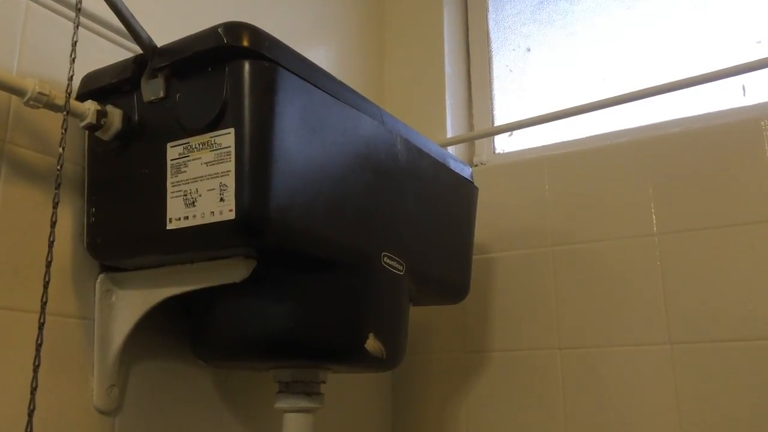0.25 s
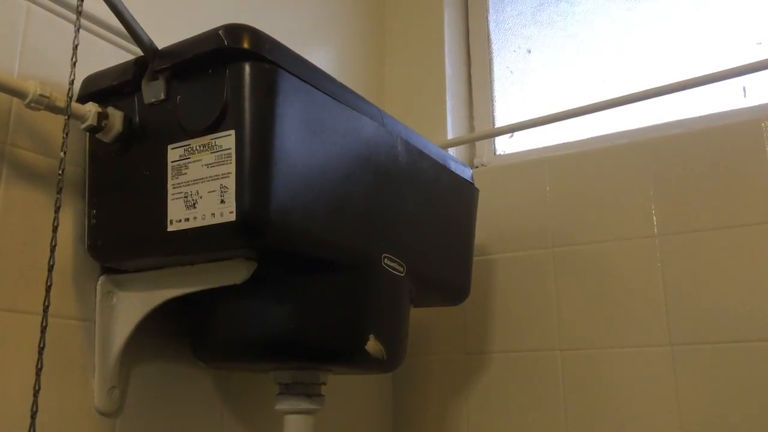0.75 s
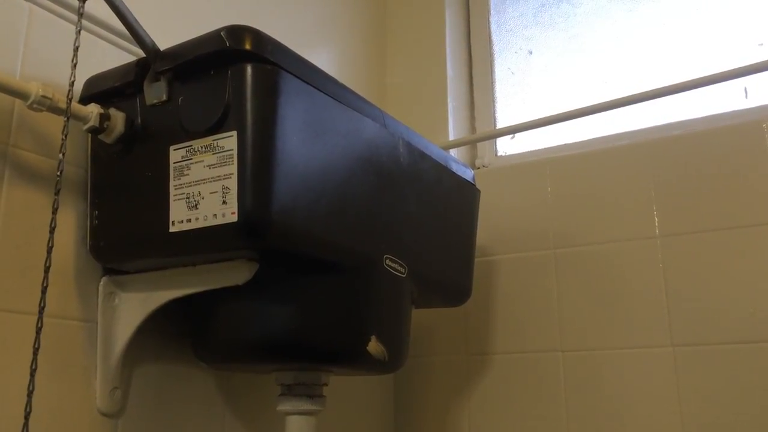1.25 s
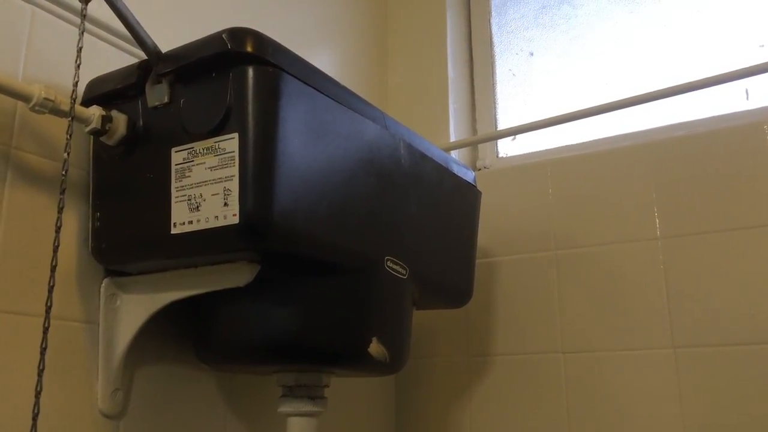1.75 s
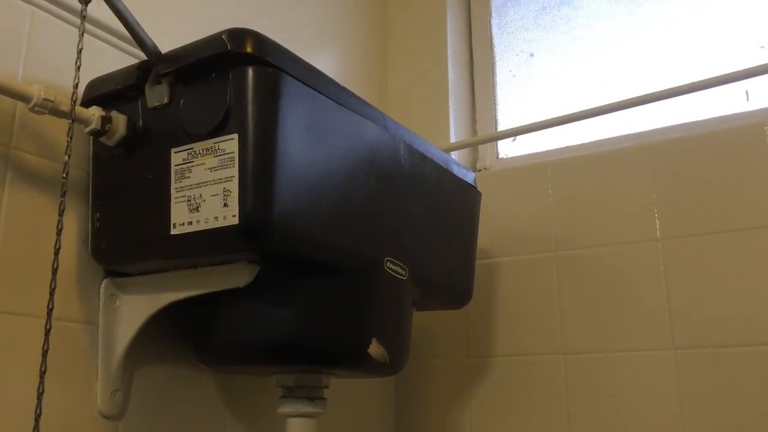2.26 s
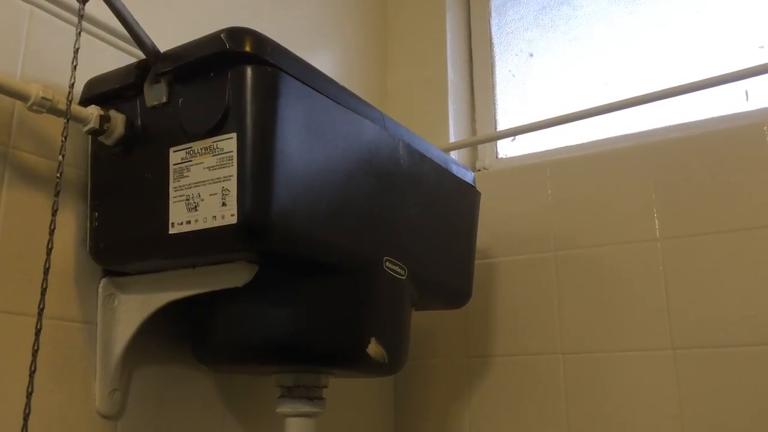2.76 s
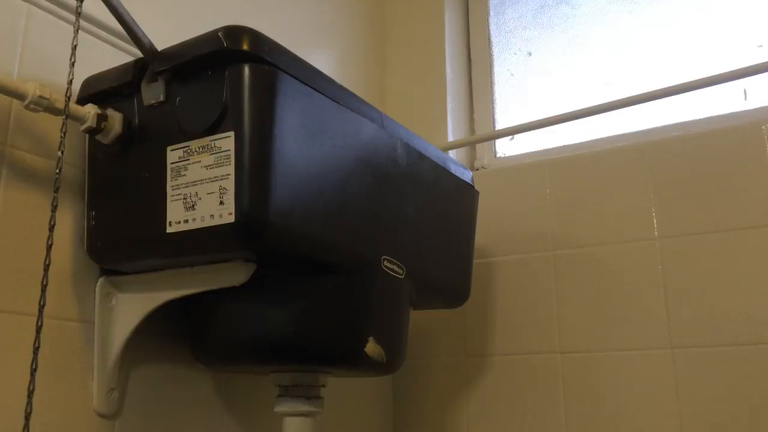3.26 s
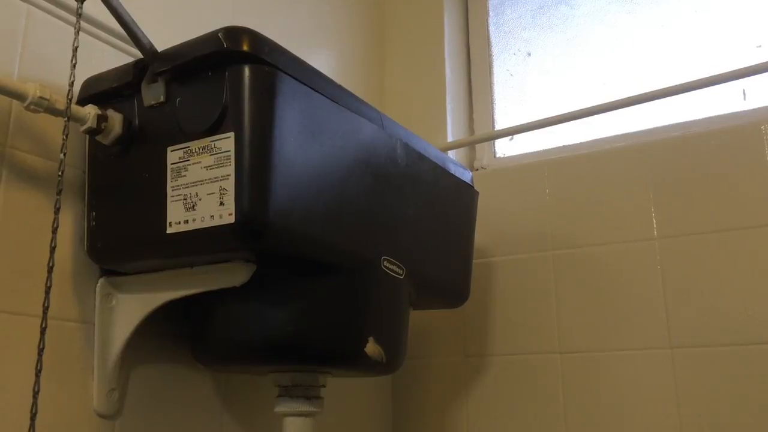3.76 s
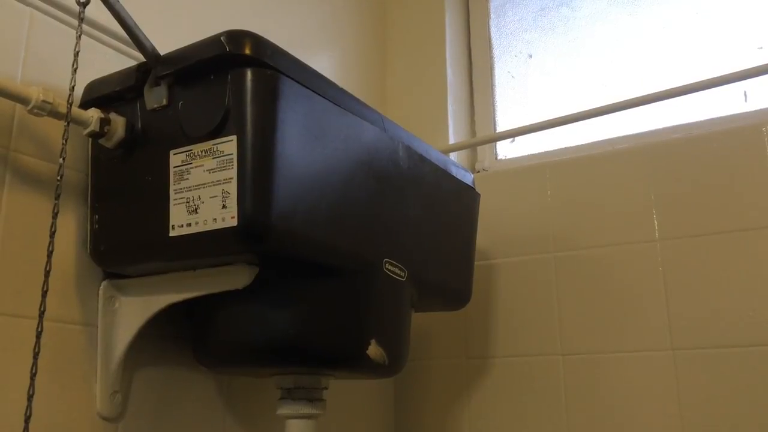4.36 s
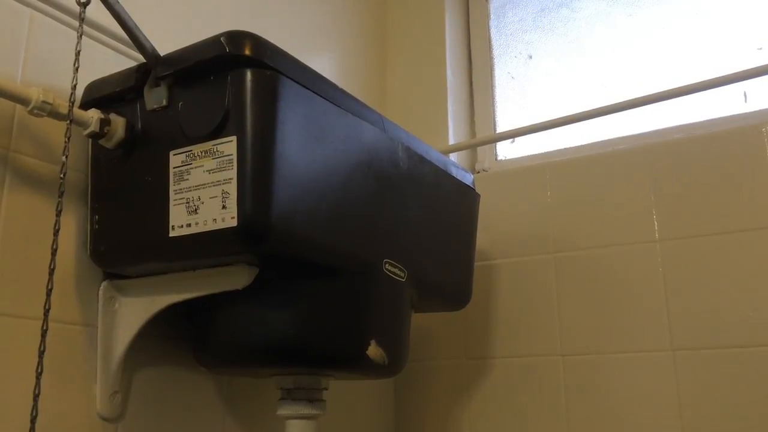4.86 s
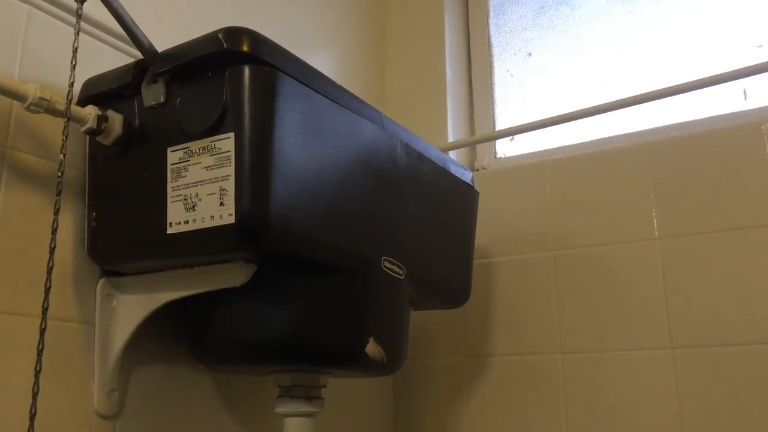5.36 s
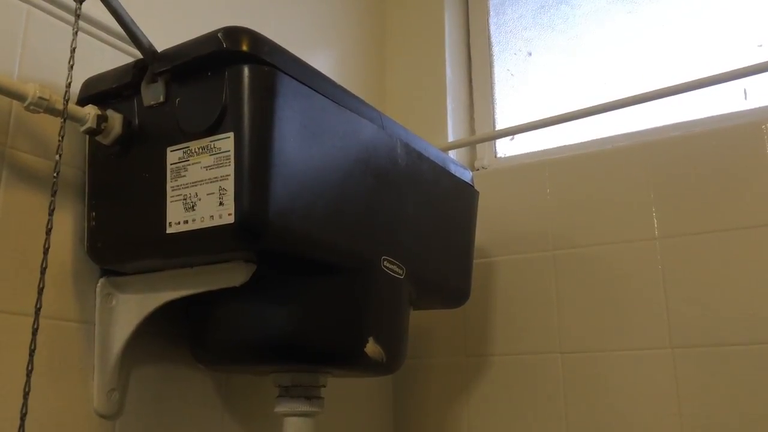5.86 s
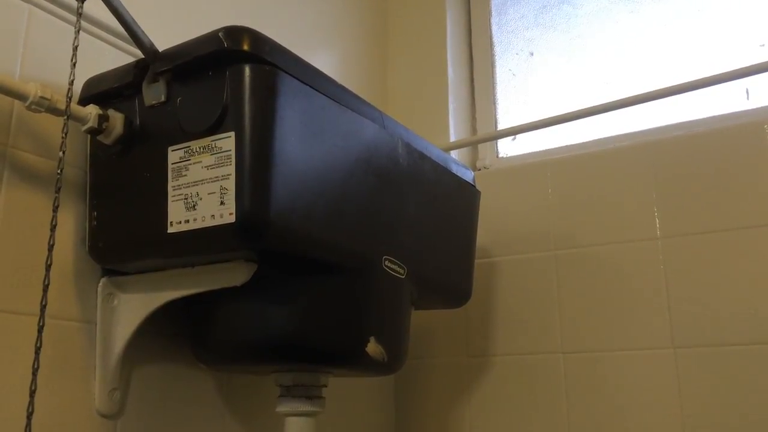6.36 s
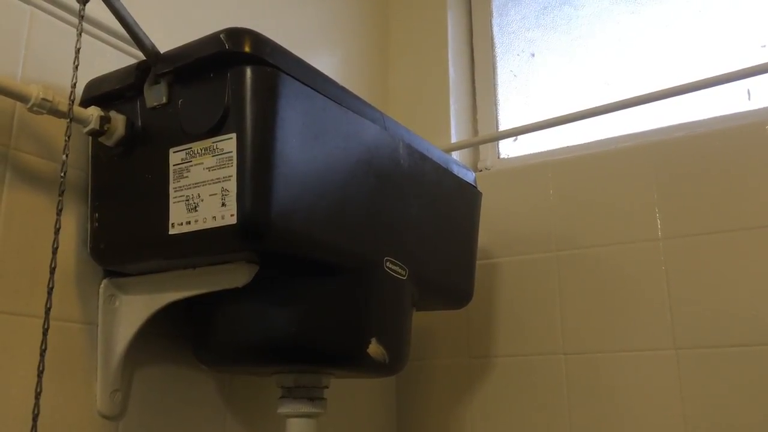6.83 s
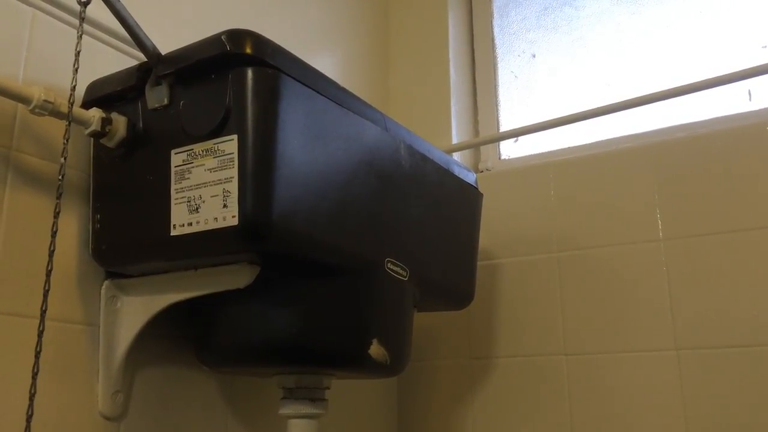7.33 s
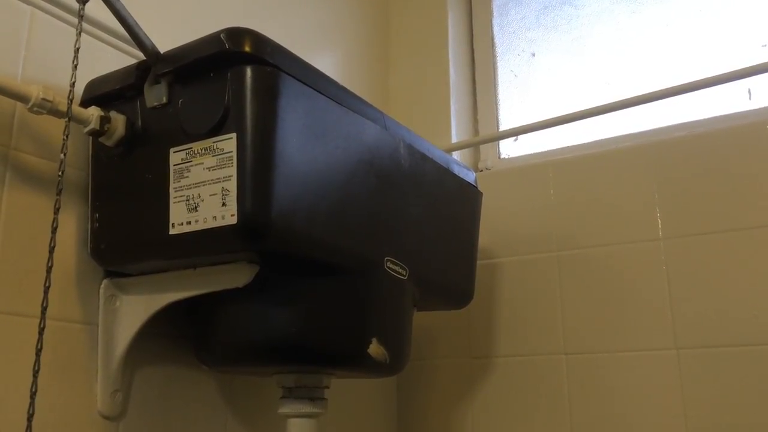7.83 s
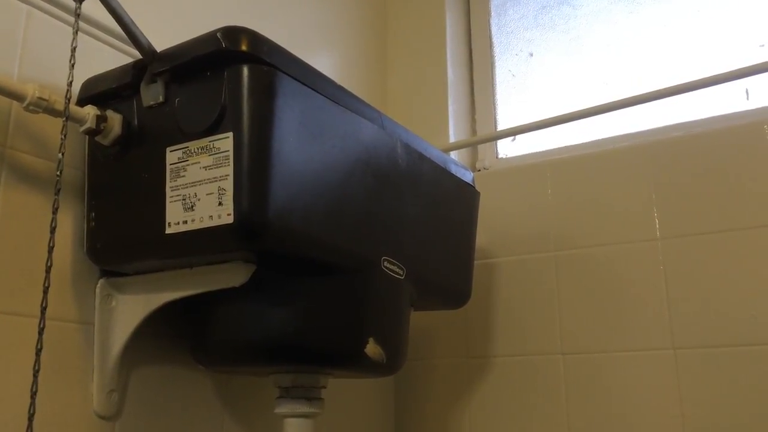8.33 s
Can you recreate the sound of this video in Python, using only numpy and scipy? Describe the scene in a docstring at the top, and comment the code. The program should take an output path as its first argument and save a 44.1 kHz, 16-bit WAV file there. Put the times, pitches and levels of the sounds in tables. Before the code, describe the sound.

A high plastic toilet cistern refills in a small tiled room. A bright, ringing water hiss with surging gush comes first; the gush fades as the float valve narrows, and a thin, fluttering high whistle grows clearer. The whistle climbs late as the flow weakens, without fully stopping. A hollow low hum wavers underneath, with faint soft bumps early and near the end. Steady, fairly close microphone, the same in both channels.

```python
"""A high toilet cistern refills through its float valve in a small tiled room.
At first the jet hisses and rings the tank, over a surging gush, a duller pipe rush and a hollow low note.
As the float rises the gush fades; the narrowing gap sings a thin, fluttering whistle that dips slightly,
then climbs while the flow dies down. Soft bumps fall early and near the end.
Hiss, gush and rush are coloured noise; the notes are mostly narrow noise, shaped by tank and tile echoes."""
import sys
import numpy as np
from scipy import signal
from scipy.fft import rfft, irfft, next_fast_len
from scipy.io import wavfile
from scipy.ndimage import map_coordinates

SR = 44100
rng = np.random.default_rng(int(sys.argv[2]) if len(sys.argv) > 2 else 0)


def dump_mix(stems):
    """Bounce the given channels to the path in sys.argv[1] as a 16-bit WAV at rate SR."""
    frames = np.atleast_2d(stems).T  # one column per channel
    limited = np.clip(frames, -1, 1)  # hard clip at full scale
    pcm = np.round(limited * 32767).astype(np.int16)
    wavfile.write(sys.argv[1], SR, pcm)


N = 378819

# Float valve. Each row: time in seconds, mean jet level in dB before the tank, closure from 0 to 1.
VALVE_COURSE = [(0, -42.5, 0), (1.2, -43.5, 0.01), (2.5, -44, 0.33), (3.7, -45, 0.6), (4.6, -44.5, 0.66),
                (5.4, -45.5, 0.79), (6.2, -46, 0.91), (7, -48, 0.85), (7.7, -48.5, 0.88),
                (8.59, -50.5, 0.87)]
# Jet hiss colour. Each row: frequency in Hz, relative dB per Hz valve open, the same nearly shut.
JET_COLOUR = [(200, -21, -29), (450, -23.5, -27.5), (770, -29.5, -26.5), (1340, -25, -22.5),
              (1960, -15, -17.5), (2340, 1.5, -13), (3160, -5.5, -2.5), (3980, 6, 8), (4540, -0.5, 2),
              (5000, -1, -1), (6250, 2.5, -3), (8050, -0.5, 0), (8780, -4, -4), (10560, -6.5, -5),
              (13500, -12, -10.5), (15100, -16.5, -16)]
# Gush colour. Each row: frequency in Hz, relative dB per Hz.
GUSH_COLOUR = [(200, -58), (420, -21.5), (600, -44), (1080, -29), (1350, -53), (1750, -21), (2250, -13.5),
               (2550, -11.5), (2830, 1), (3070, 1.5), (3300, -7), (3800, -33), (5000, -63)]
# Surges of the stream. Each row: centre in seconds, rise in dB.
GUSH_SURGES = [(.32, 5.5), (.59, 3), (.85, 3), (1.13, 6), (1.28, 4), (1.6, 2.5), (2.4, 3), (2.54, 4)]
# Supply pipe flow. Each row: time in seconds, level in dB before the tank.
PIPE_COURSE = [(0, -57.5), (1.5, -62.5), (4.8, -61.5), (6, -66), (7.7, -66), (8.59, -63)]
# Pipe rush colour. Each row: frequency in Hz, relative dB per Hz.
PIPE_COLOUR = [(300, -28), (800, -22), (1250, -17.5), (1450, -12), (1850, -1), (2300, 2.5), (2600, 3),
               (3100, -11), (5000, -42)]
# Note of the valve gap. Each row: time in seconds, pitch in Hz, width in Hz.
WHISTLE_COURSE = [(0, 3470, 390), (2.2, 3395, 255), (4, 3428, 112), (4.6, 3475, 92), (5.6, 3526, 80),
                  (6.5, 3540, 115), (7.5, 3704, 250), (7.85, 3872, 150), (8.59, 3990, 220)]
# Bands lifted or cancelled by tank, pipe and tiled corner. Each row: centre in Hz, width in Hz, gain in dB.
TANK_RINGS = [(476, 40, 14), (694, 22, 11.5), (837, 28, 9), (1084.7, 51, 16), (1379, 28, 15.5),
              (1470, 15.5, 12.5), (1492, 13, 9.5), (1648, 20, 10), (1827, 40, 9), (1925, 21, 10.5),
              (2217, 45, 9), (2536, 54, -6.5), (2756, 26, 4.5), (2867, 21, 10.5), (2940, 65, -3.5),
              (3080, 31, 9), (3280, 49, -5), (3396, 12, 10.5), (3400, 23, -12.5), (3390, 41, 5),
              (3512, 27, 6.5), (3656, 16, 9.5), (3800, 10, 6.5), (3760, 28, -9), (3870, 21, 6.5),
              (3990, 17, 4.5), (4000, 15, 3), (4010, 33, -8.5), (4153, 23, 7.5), (4203, 64, -7.5),
              (4420, 22, 10), (4424, 54, -8.5), (4510, 38, 5), (4830, 22, 7.5), (5450, 25, 8),
              (5754, 33, 10), (6170, 40, 8), (7530, 26, 3), (7640, 33, 5.5), (8140, 30, 1.5)]
# Strongest swells of the low note. Each row: centre in seconds, peak in dB.
LOW_NOTE_SWELLS = [(.03, -58), (.24, -55.5), (1.17, -57), (2.39, -55), (2.97, -58), (3.31, -54),
                   (3.49, -57), (6.88, -60), (7.45, -55)]
# Room background colour. Each row: frequency in Hz, relative dB per Hz.
AIR_COLOUR = [(15, -38), (28, -14), (38, -2.5), (60, -1.5), (95, 2), (135, -3), (180, -3.5), (230, 0),
              (270, -10.5), (420, -9), (560, -16.5), (1200, -15.5), (4000, -25.5)]
# Soft bumps. Each row: start in seconds, pitch in Hz, nominal level in dB, t60 in seconds.
BUMPS = [(.819, 600, -64, .03), (7.94, 420, -61.5, 0.14), (8.554, 55.4, -51, .2)]

GUSH_OPEN_DB = -48  # wide open, between surges, before the tank
SURGE_HALF_S, SWELL_HALF_S = 0.05, 0.039
WHISTLE_DB = 1.82  # against the jet when 100 Hz wide, before the tank
FOCUS_DB_PER_HALVING = 3  # whistle gain for each halving of its width
BOOM_HZ, BOOM_DB = 206.6, -22  # level against the jet before the tank
TOP_HZ = 15330


def amp(db):
    """Decibels to gain."""
    return 10 ** (np.asarray(db) / 20)


def unit(x):
    """Scale to rms 1."""
    return x / np.sqrt(np.mean(np.abs(x) ** 2) + 1e-20)


def curves(rows):
    """One value per sample for each column after the time."""
    s, *cols = np.transpose(rows)
    t = np.arange(N) / SR
    return [np.interp(t, s, c) for c in cols]


def wobble(rate_hz):
    """A smooth random curve with rate_hz knots a second."""
    knots = rng.standard_normal(int(N * rate_hz / SR) + 4)
    return map_coordinates(knots, [np.arange(N) * rate_hz / SR])


def swells(rows, half_s):
    """Sum of bell-shaped swells, one for each (second, height) row."""
    t = np.arange(N) / SR
    return sum(height * np.exp(-((t - s) / half_s) ** 2) for s, height in rows)


def filtered(x, response):
    """Multiply the spectrum of x by a response of frequency in Hz."""
    size = next_fast_len(N + SR // 2)
    freqs_hz = np.fft.rfftfreq(size, 1 / SR)
    return irfft(rfft(x, size) * response(freqs_hz), size)[:N]


def noise(colour):
    """Noise of rms 1 with a (Hz, dB) colour, interpolated over log frequency."""
    f, db = np.transpose(colour)
    white = rng.standard_normal(N)
    return unit(filtered(white, lambda hz: amp(np.interp(np.log(hz + 1), np.log(f), db))))


def narrow_noise(pitch_hz, width_hz, skirt):
    """A resonance driven by turbulence: a carrier whose size and phase wander as fast as it is wide."""
    steps = 32  # drift points per reciprocal width
    clock = np.cumsum(width_hz * np.ones(N)) * steps / SR
    size = next_fast_len(int(clock[-1]) + 2)
    detune = np.fft.fftfreq(size, 1 / (2 * steps))  # in half widths
    push = rng.standard_normal((size, 2)) @ [1, 1j]
    resonance = 1 / (1 + 1j * detune) / (1 + 1j * detune / skirt) ** 2
    drift = np.fft.ifft(np.fft.fft(push) * resonance)
    carrier = np.exp(2j * np.pi * np.cumsum(pitch_hz * np.ones(N)) / SR)
    return unit((np.interp(clock, np.arange(size), drift) * carrier).real)


def valve():
    """Jet level in dB and how far the float has closed the valve."""
    jet_db, closure = curves(VALVE_COURSE)
    return jet_db, np.clip(closure, 0, 1)


def jet():
    """Broad turbulent hiss that crossfades from open to nearly shut colour as the valve closes."""
    jet_db, closure = valve()
    hz, open_db, shut_db = np.transpose(JET_COLOUR)
    wide = noise(np.c_[hz, open_db])
    tight = noise(np.c_[hz, shut_db])
    hiss = np.sqrt(1 - closure) * wide + np.sqrt(closure) * tight
    return amp(jet_db + 0.4 * wobble(30)) * hiss


def gush():
    """The stream in the valve body shrinks with the opening; its strongest surges briefly sing."""
    _, closure = valve()
    level_db = GUSH_OPEN_DB + swells(GUSH_SURGES, SURGE_HALF_S) + 0.51 * wobble(14)
    surge = (1 - closure) * amp(level_db)
    song = surge / surge.max() * narrow_noise(pitch_hz=2844, width_hz=37, skirt=2.5)
    return surge * (noise(GUSH_COLOUR) + amp(-5) * song)


def pipe():
    """A duller rush of flow in the supply pipe, under the hiss."""
    pipe_db, = curves(PIPE_COURSE)
    return amp(pipe_db) * noise(PIPE_COLOUR)


def whistle():
    """The valve gap's fluttering note is louder the purer it is, with a faint octave."""
    jet_db, _ = valve()
    pitch_hz, width_hz = curves(WHISTLE_COURSE)
    halvings = np.log2(100 / width_hz)
    note = narrow_noise(pitch_hz, width_hz, skirt=3.5)
    octave = narrow_noise(2 * pitch_hz, 2 * width_hz, skirt=3.5)
    level_db = jet_db + WHISTLE_DB + FOCUS_DB_PER_HALVING * halvings
    return amp(level_db) * (note + amp(-15.5) * octave)


def tank(x):
    """Resonances lift, and cancellations thin, narrow bands of whatever the water plays."""
    def gain(f):
        return amp(sum(db / (1 + (2 * (f - hz) / width) ** 2) for hz, width, db in TANK_RINGS))
    return filtered(x, gain)


def tiles(x, t60_s, wet_db):
    """Dense reflections from hard walls, as decaying noise, comb the hiss finely."""
    t = np.arange(SR // 2) / SR
    tail = rng.standard_normal(len(t)) * amp(-60 * t / t60_s)
    echo = signal.fftconvolve(x, tail / np.linalg.norm(tail))[:N]
    return (x + amp(wet_db) * echo) / np.sqrt(1 + amp(wet_db) ** 2)


def boom():
    """The jet stirs the air in the tank into a low, wavering note that now and then swells."""
    jet_db, _ = valve()
    murmur = amp(jet_db + BOOM_DB) * narrow_noise(BOOM_HZ, width_hz=10, skirt=4.3)
    ring_hz = BOOM_HZ + 3 * wobble(25.16)
    ring = np.sin(2 * np.pi * np.cumsum(ring_hz) / SR)
    peaks = [(s, amp(db)) for s, db in LOW_NOTE_SWELLS]
    return murmur + ring * swells(peaks, SWELL_HALF_S)


def background():
    """Low background noise and the room's own deep mode."""
    mode = narrow_noise(pitch_hz=113, width_hz=12, skirt=6.8)
    return amp(-67) * noise(AIR_COLOUR) + amp(-72.5) * mode


def knocks():
    """Each bump is a heavily damped ring with a dull puff of noise at its pitch."""
    out = np.zeros(N)
    for start_s, hz, db, t60_s in BUMPS:
        t = np.maximum(np.arange(N) / SR - start_s, 0)
        ring = 0.4 * np.sin(2 * np.pi * hz * t)
        puff = 0.94 * narrow_noise(hz, 0.6 * hz, skirt=3.3)
        onset = 1 - np.exp(-t / 0.0027)
        out += amp(db + 0.5 - 60 * t / t60_s) * onset * (ring + puff)
    return out


def scene():
    """Water through tank and tiles, plus the rest, alike in both channels."""
    water = tank(jet() + gush() + pipe() + whistle())
    water = tiles(water, t60_s=0.5, wet_db=-14)
    return np.tile(water + boom() + background() + knocks(), (2, 1))


def record(dry):
    """Keep only what lies below TOP_HZ."""
    return np.array([filtered(channel, lambda hz: hz < TOP_HZ) for channel in dry])


dry = scene()
out = record(dry)
dump_mix(out)
```